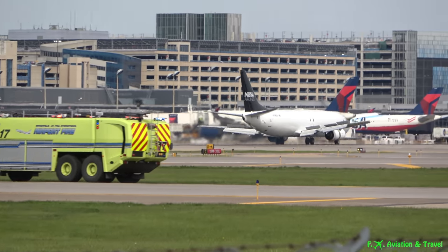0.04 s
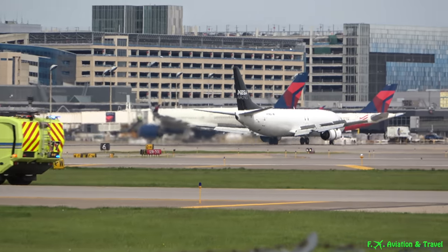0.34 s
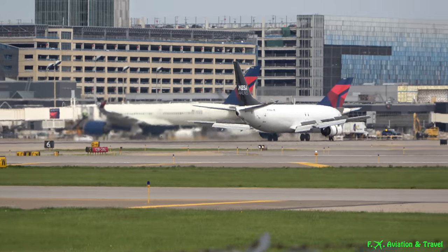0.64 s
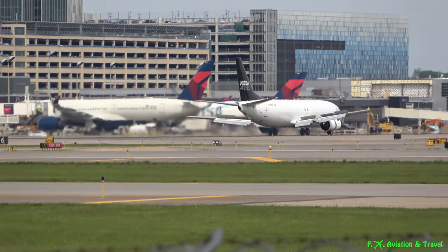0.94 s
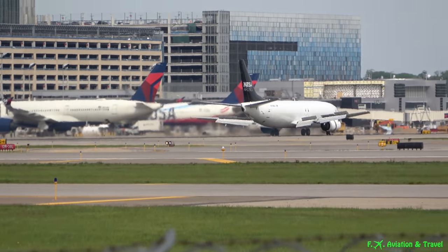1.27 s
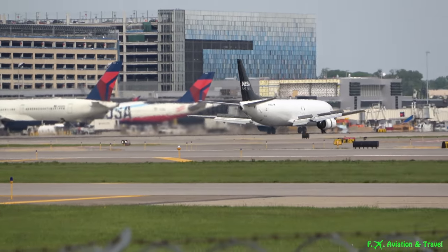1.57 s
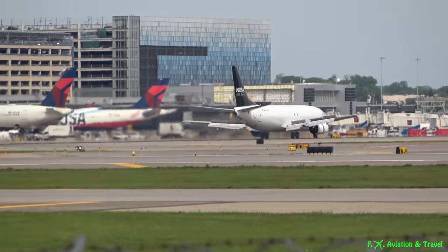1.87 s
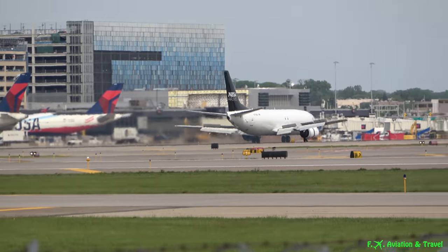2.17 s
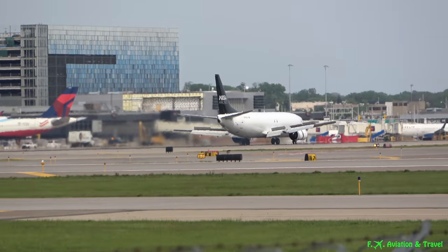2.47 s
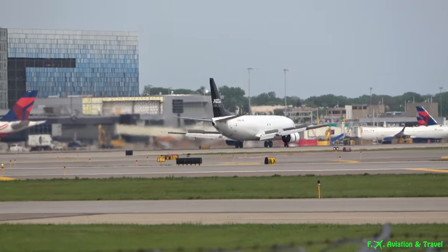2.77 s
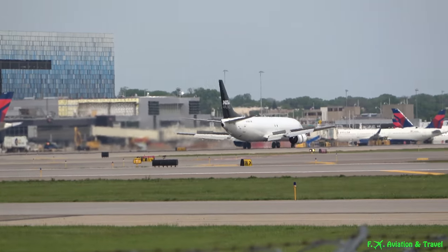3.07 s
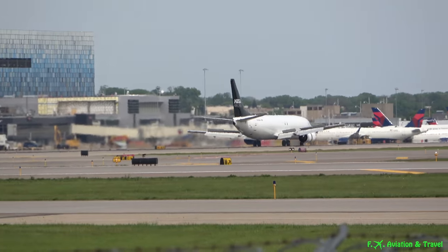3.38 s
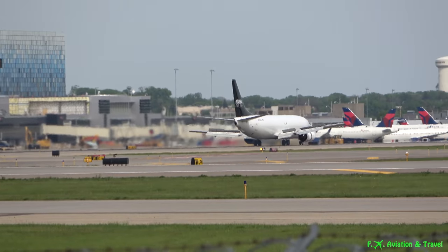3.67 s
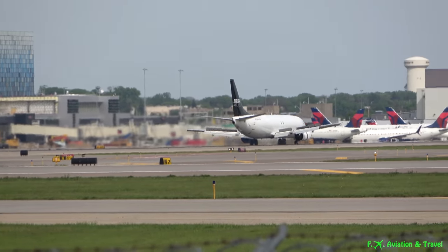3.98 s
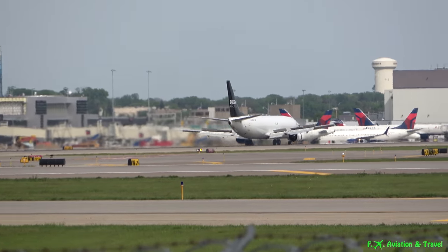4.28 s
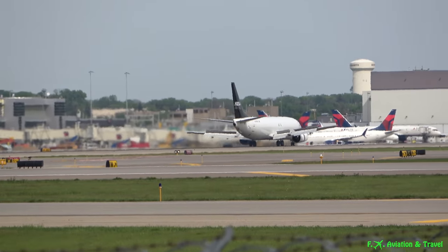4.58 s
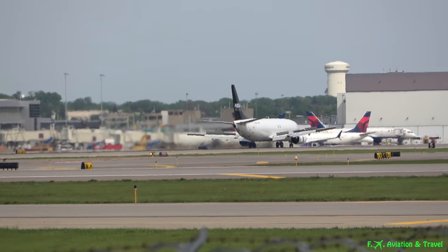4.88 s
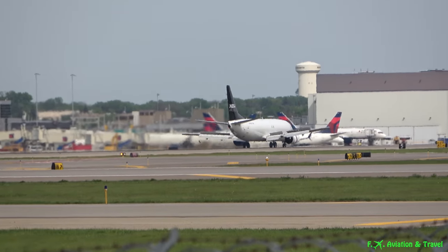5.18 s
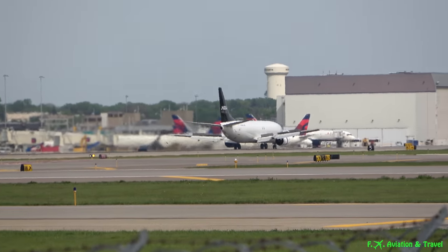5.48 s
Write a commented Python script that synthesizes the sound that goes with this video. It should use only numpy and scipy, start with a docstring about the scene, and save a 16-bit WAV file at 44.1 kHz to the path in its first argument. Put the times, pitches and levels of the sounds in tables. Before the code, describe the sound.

A distant jet airliner rolls along a runway at a windy airfield. Its broad, rushing engine roar, tinged with turbine whine, swells, sinks in pitch as it passes, then eases a little. Gusts thump and rumble on the microphone throughout, growing heavier and steadier in the second half. Faint dry ticks and a thin hiss lie above the roar.

```python
"""An airfield on a windy day, where a distant airliner rolls out along the runway after landing.
Turbulent exhaust makes a broadband roar, tinged with turbine whines; it swells, and its spectral crest
sinks in pitch as the aircraft goes by. Eddies in the gusts strike the microphone and rumble.
Faint ticks, a few bird-like chirps and a thin hiss lie above the roar."""
import sys
import numpy as np
from scipy import signal
from scipy.fft import rfft, irfft
from scipy.io import wavfile
from scipy.ndimage import uniform_filter1d, minimum_filter1d

SR = 44100
rng = np.random.default_rng(int(sys.argv[2]) if len(sys.argv) > 2 else 0)


def transcribe(u):
    """Save the signal u as a 16-bit wav file named by the first command-line argument.

    u: samples, shape (n,) or (channels, n), limited to [-1, 1]; the rate is SR.
    q: integer samples, one column per channel.
    """
    v = np.clip(np.atleast_2d(u).T, -1, 1)
    q = np.round(v * 32767).astype(np.int16)
    wavfile.write(sys.argv[1], SR, q)


N = 252693


def roar(t, pass_s=2.64, pass_width_s=1.35, pass_hz=1210, sink_hz_per_s=870, crest_db=4.4):
    """Jet noise: turbulent exhaust radiates a broad spectrum, dulled by distance and by moving air."""
    # course of the roar as the aircraft rolls by: (time [s], level [dB], spectral tilt [dB/octave])
    course = [(0, -26, 1.5), (.55, -22, 1.45), (1.0, -18.5, -0.6), (1.35, -18.5, 0.4), (1.8, -18.5, 0.7),
              (2.65, -16, 0.07), (3.15, -16.5, .1), (4.1, -20.5, -.5), (4.6, -19.5, .5), (5.73, -21, 0.3)]
    # underlying spectrum: (frequency [Hz], relative density [dB])
    spectrum = [(90, -28), (200, -9), (300, -1.5), (430, -1), (560, -0.5), (720, -1.5), (920, -4.5),
                (1130, -7), (1550, -10), (2000, -17), (2650, -25.5), (3100, -35.5), (3600, -47.5),
                (5200, -72)]
    # stationary peaks and dips: (frequency [Hz], width [Hz], gain [dB])
    ripple = [(430, 45, -1.8), (500, 45, 1), (750, 70, 2.9), (900, 70, -2.9), (1110, 80, 2.2),
              (2900, 150, 1.5)]
    # narrow-band turbine whines: (time [s], half length [s], frequency [Hz], width [Hz], gain [dB])
    whines = [(0.897, 0.2, 967, 44.6, 10.5), (.9, 1.0, 3990, 260.4, 7.5), (2.4, 1.1, 1490, 130, 2.3),
              (4.599, 0.16, 3260, 200, 7), (4.7, 1.2, 1124, 69.6, 3)]
    # gusts swell the low end: (time [s], half length [s], frequency [Hz], width [Hz], gain [dB])
    surges = [(.76, .05, 263, 70.5, 3.5), (0.977, .07, 340, 140, 5.5), (1.597, .4, 344, 49.8, 3.5),
              (3.603, 0.063, 296, 69, 3)]
    when, hz = frame_grid(size=1024)
    field = read(spectrum, hz) + follow(course, when)[1] * np.clip(np.log2(hz / 900), -2, 2)
    # a broad crest sinks steadily between two limits and stands highest as the aircraft passes
    crest_hz = np.clip(pass_hz - sink_hz_per_s * (when - pass_s), 265, 2850)
    height_db = crest_db * bell((when - pass_s) / pass_width_s)
    field += height_db * bell(np.log2(hz / crest_hz) / .52)
    field += sum(db * bell((hz - f) / width) for f, width, db in ripple)
    field += sum(db * bell((when - s) / half) * bell((hz - f) / width)
                 for s, half, f, width, db in whines + surges)
    # eddies along the path make patches of the spectrum come and go by 1 dB rms
    patches = uniform_filter1d(rng.standard_normal(field.shape), size=10, axis=0)
    field += evened(uniform_filter1d(patches, size=24, axis=1))
    return gain_of(follow(course, t)[0]) * steadied(noise_from(field), span_s=.23)


def wind(t, drone_from_db=-19, drone_share_per_db=.13, drone_pitch_ratio=1.12, waver_hz=13):
    """Turbulent pressure on the microphone: large eddies rumble, middling ones buffet, small flutter."""
    # the microphone's pickup of wind: (frequency [Hz], gain [dB])
    response = [(12, -21.5), (25, -7), (45, 0.5), (300, -1), (700, -4), (2000, -29.5)]
    when, hz = frame_grid(size=4096)

    def eddies(centre_hz, octaves, span_s):
        """A spread of eddy sizes gives a hump of noise, its skirts straight in dB per octave."""
        distance = np.log2(hz / centre_hz) / octaves * np.ones_like(when)
        return steadied(noise_from(read(response, hz) - 11 * np.sqrt(1 + distance ** 2)), span_s)

    buffet_db, rumble_db, flutter_db, eddy_hz = gusts(t)
    # in a strong blow the eddies are shed almost periodically: buffeting firms into a wavering drone
    drone_hz = drone_pitch_ratio * eddy_hz + waver_hz * wander(18.13)
    drone = 2 ** .5 * np.sin(2 * np.pi * np.cumsum(drone_hz) / SR)
    share = np.clip(drone_share_per_db * (buffet_db - drone_from_db), 0, 1)
    irregular = eddies(np.interp(when, t, eddy_hz), octaves=.53, span_s=.1)
    buffeting = np.sqrt(1 - share) * irregular + np.sqrt(share) * drone
    return (gain_of(buffet_db) * steadied(buffeting, span_s=.38)
            + gain_of(rumble_db - .5) * eddies(50, octaves=.26, span_s=.29)
            + gain_of(flutter_db - 5) * eddies(190, octaves=.45, span_s=.18))


def gusts(t, rise_s=.064, fall_s=.072):
    """Incoherent gusts add in power as they rise, hold and decay: gives three levels and an eddy pitch."""
    # gusts, in relative levels:
    # (start [s], length [s], buffeting [dB], rumble [dB], flutter [dB], eddy pitch [Hz])
    blows = [(-.1, 0.59, -22, -27.5, -28.5, 76), (0.421, 0.24, -19.5, -26, -29.5, 70.2),
             (0.702, 0.142, -17.5, -23, -17, 64.6), (0.881, 0.16, -25.5, -47, -19, 101),
             (1.4, 0.21, -26.5, -39, -32.5, 100.5), (1.695, 0.1, -18, -30, -24.5, 97),
             (2.169, 0.25, -21, -37, -26.5, 96), (2.626, 0.087, -22, -44, -31.5, 97.3),
             (2.849, .3, -17.5, -26, -28, 91.95), (3.182, .6, -17.5, -25.5, -24.5, 89),
             (3.808, 0.65, -14, -31, -28, 85), (4.522, 0.19, -17.5, -26.5, -27, 85.75),
             (4.766, 0.92, -15.5, -30.5, -32, 90.8)]
    # the breeze between gusts, on the same scale: (buffeting [dB], rumble [dB], flutter [dB])
    breeze = (-31.5, -50, -35.5)
    start, length, *levels_db, pitch_hz = np.transpose(blows)
    age = t[..., None] - start
    rise = np.clip(1 + age / rise_s, 0, 1)
    decay = np.exp(-np.maximum(age - length, 0) / fall_s)
    power = (rise * decay) ** 2
    levels = [10 * np.log10(power @ gain_of(db) ** 2 + gain_of(lull) ** 2)
              for db, lull in zip(levels_db, breeze)]
    weight = power + 1e-9
    return *levels, weight @ pitch_hz / weight.sum(-1)


def ticks(t, tick_db=6.3, decay_s=.00016, stray_db=-68.5):
    """Brief impulses have broad spectra: dry single ticks, spells of crackle and weaker stray ticks."""
    # the clearest ticks: (time [s], relative level [dB])
    onsets = [(0.6968, -44.5), (0.7501, -45), (0.9567, -41), (1.742, -40.5), (2.4199, -36), (2.485, -37),
              (2.642, -37), (2.6724, -37), (2.7663, -40), (2.775, -37), (2.8964, -36), (2.9253, -39),
              (2.9516, -37), (3.1004, -36), (3.1864, -43), (3.2188, -32.5), (3.4665, -41), (3.6202, -46),
              (3.7327, -38), (3.7768, -43), (3.9478, -42.5), (4.345, -41), (4.4333, -36.5), (4.4453, -41.5),
              (4.6928, -45.5), (4.7813, -42), (4.9013, -42.5), (5.0793, -46), (5.417, -48), (5.657, -40)]
    # spectrum common to all ticks: (frequency [Hz], relative density [dB])
    spectrum = [(1500, -17.5), (3600, 5.5), (5500, -2.5), (8000, -10.5), (15000, -22)]
    # spells of fine crackle: (time [s], half length [s], level [dB])
    spells = [(.65, 0.028, -63), (1.055, .05, -60), (1.22, .05, -68), (1.81, .012, -58),
              (2.285, .035, -58.5), (2.7, .08, -65), (3.24, .03, -65), (3.45, 0.06, -70.5),
              (5.375, 0.039, -67.5)]
    colour = read(spectrum, np.fft.rfftfreq(N, 1 / SR))
    clicks = np.zeros(N)
    for s, db in onsets:
        burst = rng.standard_normal(64) * np.exp(-t[:64] / decay_s)  # each tick has its own timbre
        clicks[round(s * SR):][:64] += gain_of(db + tick_db) * burst / np.linalg.norm(burst)
    filter_peak = irfft(gain_of(colour), N)[0]
    single = coloured(clicks, colour) / filter_peak

    def scatter(per_s):
        """Shot noise: ticks of random size at independent random moments."""
        impulses = (rng.random(N) - .5) * (rng.random(N) < per_s / SR)
        return evened(coloured(impulses, colour))

    crackle = sum(gain_of(db) * bell((t - s) / half) for s, half, db in spells) * scatter(per_s=500)
    strays = gain_of(stray_db) * bell((t - 3.4) / 2.3) * scatter(per_s=55)
    return single + crackle + strays


def bird(t, rasp_hz=120):
    """Random frequency modulation roughens short gliding whistles, like those of a small bird."""
    # faint chirps: (start [s], length [s], start pitch [Hz], end pitch [Hz], peak level [dB])
    chirps = [(1.23, .06, 5250, 5300, -69), (3.065, 0.065, 4620, 4860, -66),
              (3.099, 0.056, 4560, 4800, -63), (3.135, 0.065, 4560, 4820, -62),
              (3.135, .05, 4250, 4480, -63), (3.208, .07, 5120, 4930, -68)]
    out = np.zeros(N)
    for s, length, start_hz, end_hz, db in chirps:
        along = np.clip((t - s) / length, 0, 1)
        cycles = np.cumsum(start_hz + (end_hz - start_hz) * along + rasp_hz * wander(300)) / SR
        out += gain_of(db) * np.sin(np.pi * along) * np.sin(2 * np.pi * cycles)
    return out


def hiss(t, trim_db=-1.5, apart_db=3.):
    """Partial coherence: a thin hiss is noise common to both channels plus noise of each one's own."""
    # course of the hiss: (time [s], relative level [dB])
    course = [(0, -66.5), (2.7, -68), (3.8, -74.5), (5.73, -74.5)]
    # its spectrum: (frequency [Hz], relative density [dB])
    spectrum = [(2500, -23.5), (4200, -3), (6000, 0), (9000, -3.5), (15500, -8.5)]
    white = rng.standard_normal(N) + gain_of(apart_db) * rng.standard_normal((2, N))
    thin = evened(coloured(white, read(spectrum, np.fft.rfftfreq(N, 1 / SR))))
    return gain_of(follow(course, t)[0] + trim_db) * thin


def gain_of(db):
    """Amplitude ratio of a level in decibels."""
    return 10 ** (np.asarray(db) / 20)


def evened(x):
    """Normalisation to rms 1."""
    return x / np.sqrt(np.mean(x ** 2) + 1e-20)


def bell(x):
    """Gaussian curve of height 1."""
    return np.exp(-.5 * x ** 2)


def read(points, hz):
    """Interpolation of a spectrum table on a logarithmic frequency axis."""
    f, value = np.transpose(points)
    return np.interp(np.log(hz + 1), np.log(f + 1), value)


def follow(rows, t):
    """Linear interpolation of each column of a time table at the times t."""
    s, *columns = np.transpose(rows)
    return [np.interp(t, s, c) for c in columns]


def coloured(x, db):
    """Zero-phase filtering: one gain for each frequency of the spectrum."""
    return irfft(rfft(x) * gain_of(db), N)


def frame_grid(size):
    """The time-frequency plane: frame times as a column, bin frequencies as a row."""
    hop = size // 4
    return np.arange(N // hop + 3)[:, None] * hop / SR, np.fft.rfftfreq(size, 1 / SR) + 1


def noise_from(db):
    """Random-phase synthesis: steady noise of rms 1, coloured by a field of frames by bins."""
    size = 2 * (db.shape[1] - 1)
    height = gain_of(db)
    height = height / np.linalg.norm(height, axis=1, keepdims=True)
    spectra = height * (rng.standard_normal(db.shape) + 1j * rng.standard_normal(db.shape))
    return evened(signal.istft(spectra.T, nperseg=size, noverlap=size - size // 4)[1][:N])


def steadied(x, span_s):
    """Division by the running rms removes swells longer than span_s."""
    window = signal.windows.hann(int(span_s * SR))
    power = abs(signal.fftconvolve(x ** 2, window / window.sum(), "same"))
    return x / np.sqrt(power + 1e-9)


def wander(rate_hz):
    """Low-pass noise: a smooth random curve of rms 1 with a bandwidth of about rate_hz."""
    low_pass = bell(np.fft.rfftfreq(N, 1 / SR) / rate_hz)
    return evened(irfft(rfft(rng.standard_normal(N)) * low_pass, N))


def limited(x, ceiling=.72):
    """Peak limiting: the gain eases down around any peak above the ceiling."""
    allowed = np.minimum(1, ceiling / (abs(x).max(0) + 1e-9))
    window = signal.windows.hann(401)
    reduction = 1 - minimum_filter1d(allowed, len(window))
    return x * (1 - signal.fftconvolve(reduction, window / window.sum(), "same"))


def scene(shake_db=.74):
    """Superposition: roar, wind, ticks and chirps are alike in both channels; only the hiss differs."""
    t = np.arange(N) / SR
    engines = roar(t) * gain_of(shake_db * wander(16))  # moving air shakes the whole roar a little
    return engines + wind(t) + ticks(t) + bird(t) + hiss(t)


def record(dry, cutoff_hz=15800):
    """Channel level difference: the microphone leans right in the bass; limiter and low-pass follow."""
    # balance of the microphone: (frequency [Hz], left minus right [dB])
    balance = [(30, -1), (65, -3), (110, -4), (160, -9), (215, -12.5), (290, -3), (410, -5.5), (570, -2),
               (760, -3), (890, -4.5), (1060, 0.1), (1200, -.2), (1350, -4), (1650, -1.2), (2020, -3.5),
               (2300, -0.44)]
    ratio = gain_of(read(balance, np.fft.rfftfreq(N, 1 / SR)))
    channel_gains = 2 * np.array([ratio, np.ones_like(ratio)]) / (1 + ratio)
    leaning = irfft(rfft(dry) * channel_gains, N)
    low_pass = signal.firwin(511, cutoff_hz, window=("kaiser", 9), fs=SR)
    return signal.oaconvolve(limited(leaning), low_pass[None], "same")


dry = scene()
out = record(dry)
transcribe(out)
```